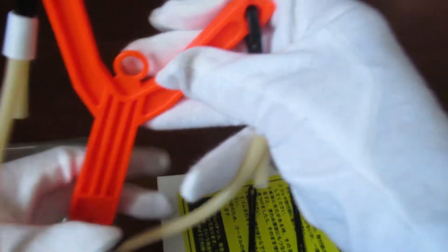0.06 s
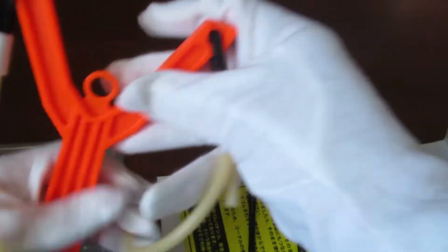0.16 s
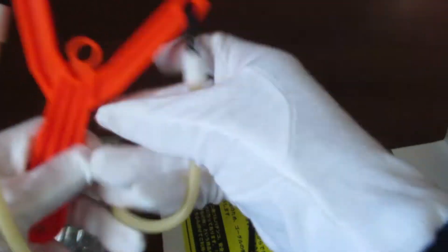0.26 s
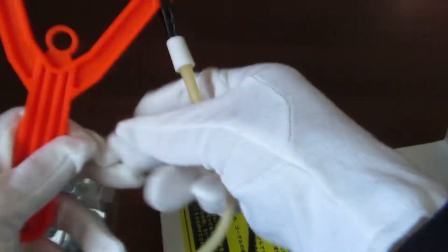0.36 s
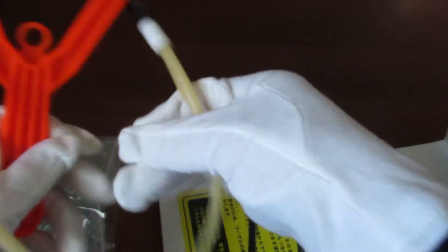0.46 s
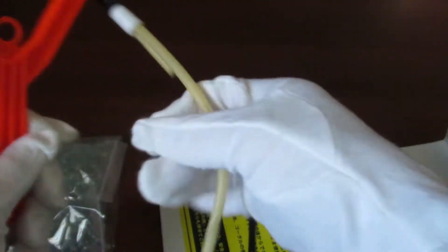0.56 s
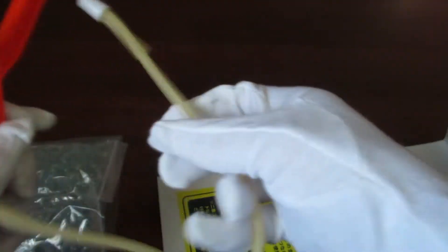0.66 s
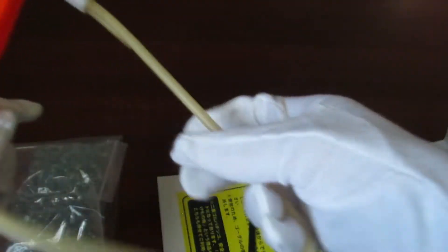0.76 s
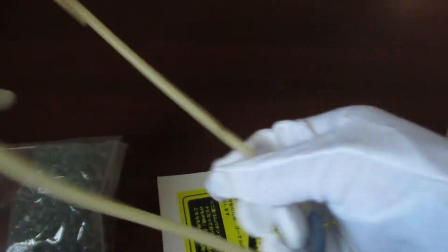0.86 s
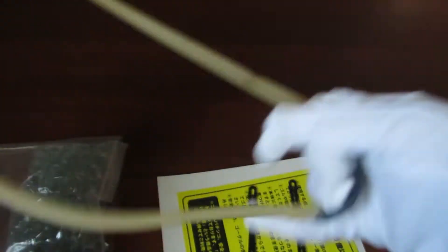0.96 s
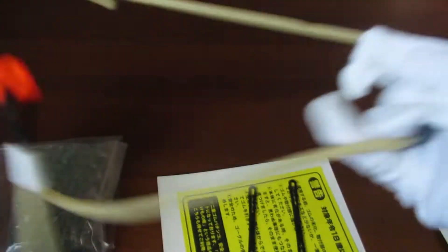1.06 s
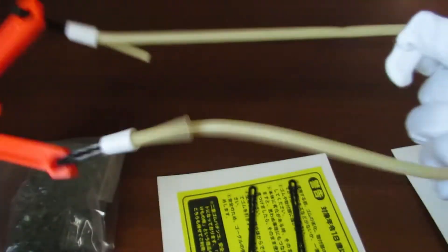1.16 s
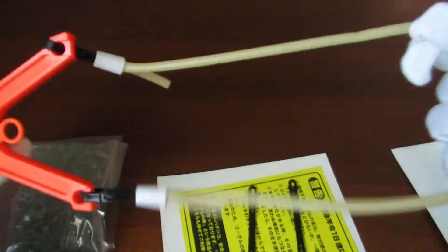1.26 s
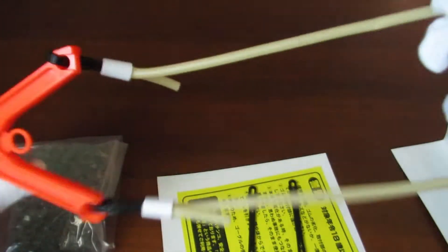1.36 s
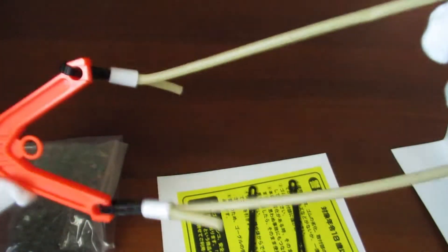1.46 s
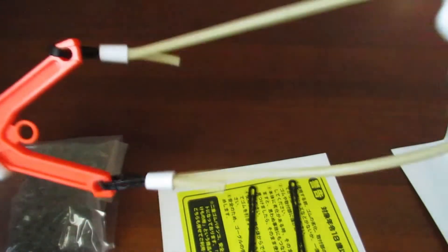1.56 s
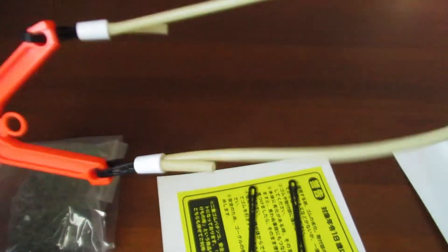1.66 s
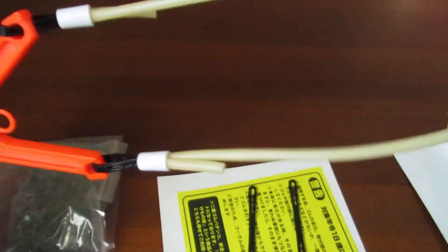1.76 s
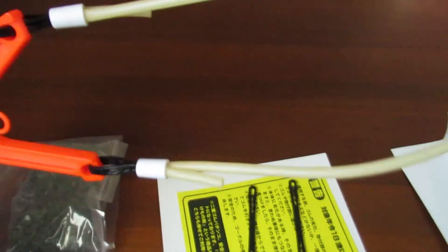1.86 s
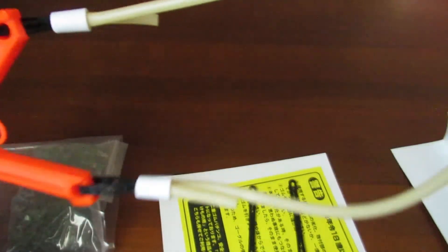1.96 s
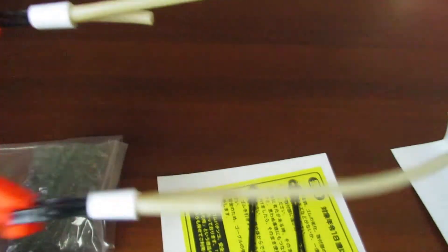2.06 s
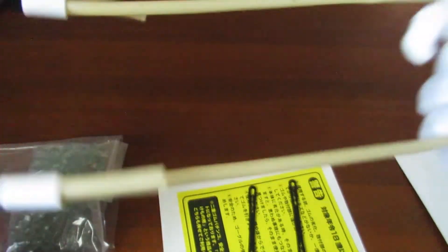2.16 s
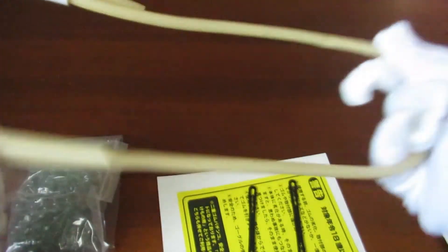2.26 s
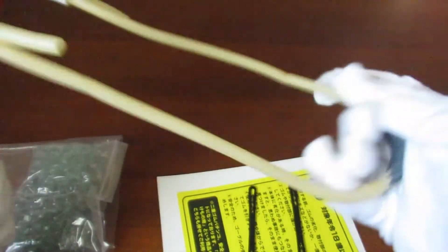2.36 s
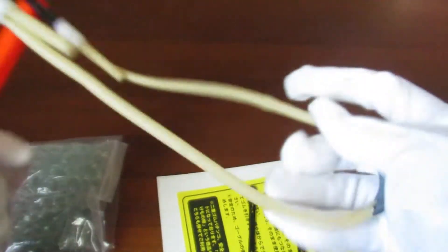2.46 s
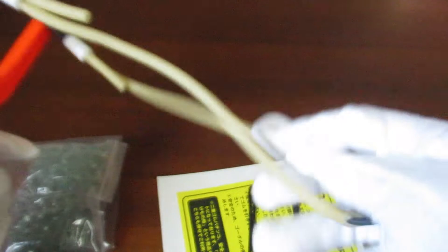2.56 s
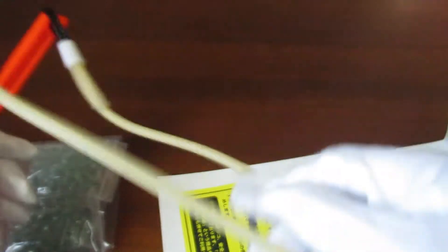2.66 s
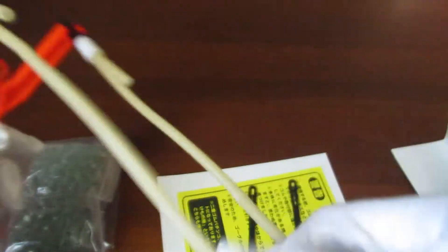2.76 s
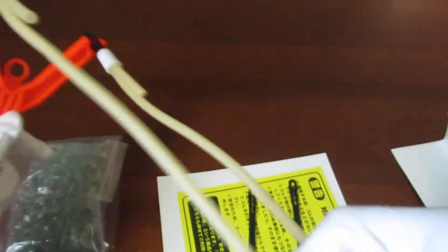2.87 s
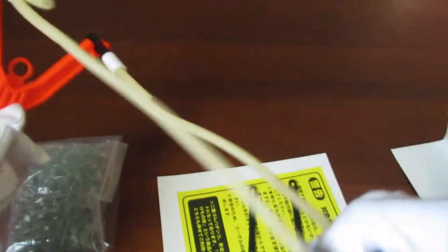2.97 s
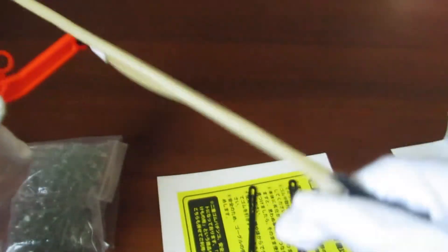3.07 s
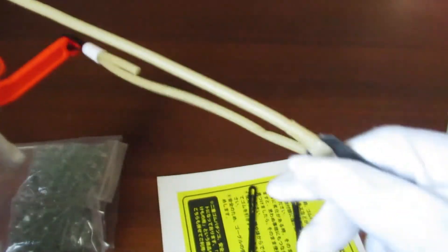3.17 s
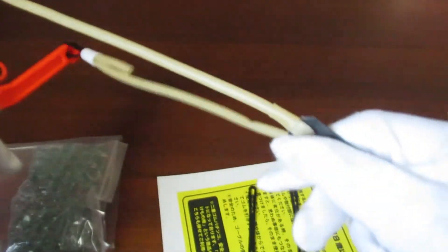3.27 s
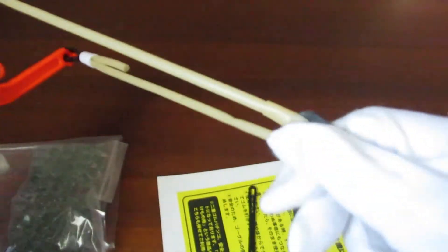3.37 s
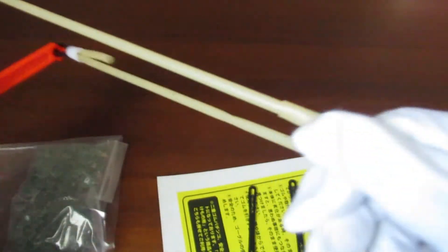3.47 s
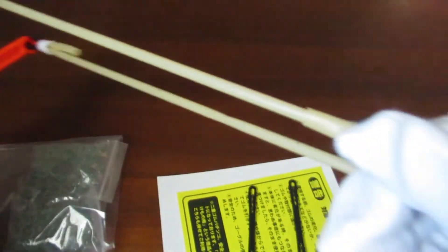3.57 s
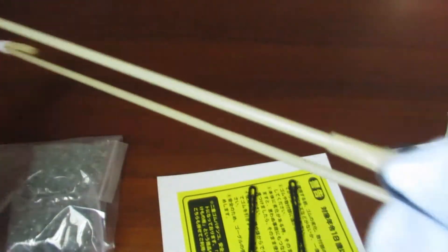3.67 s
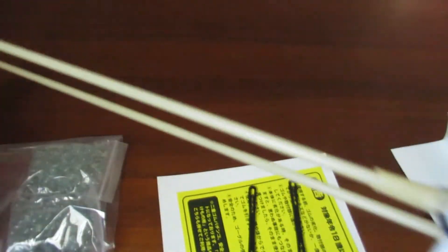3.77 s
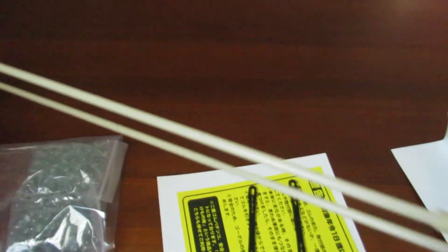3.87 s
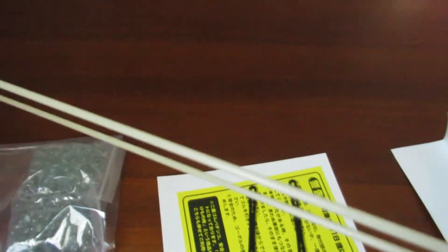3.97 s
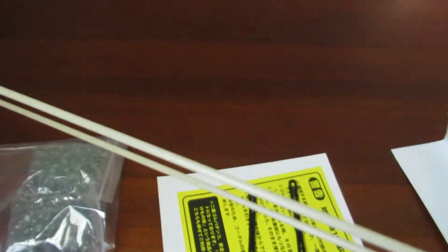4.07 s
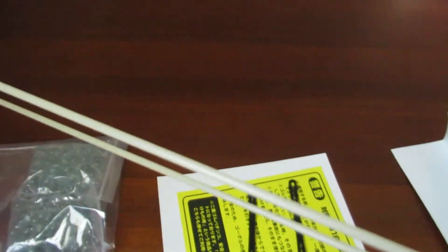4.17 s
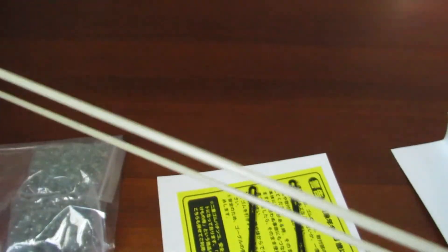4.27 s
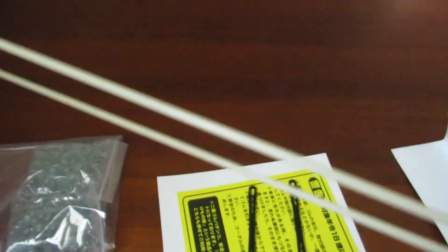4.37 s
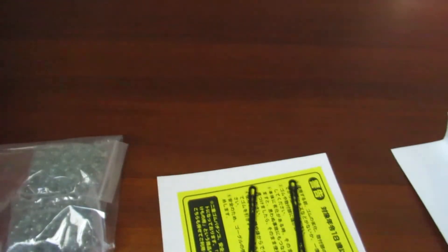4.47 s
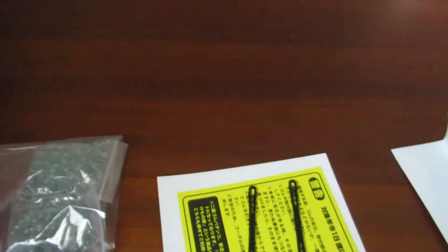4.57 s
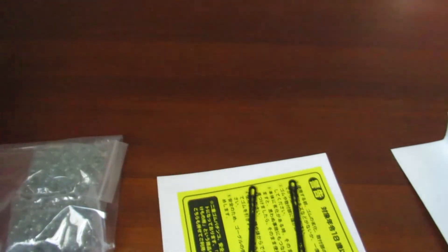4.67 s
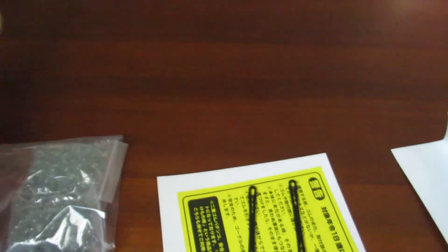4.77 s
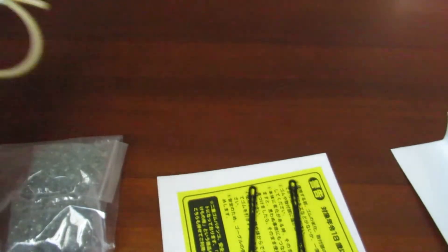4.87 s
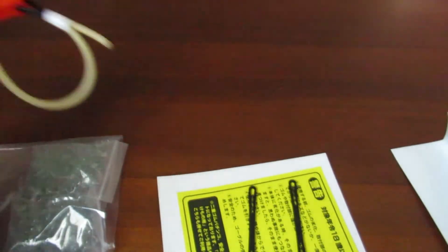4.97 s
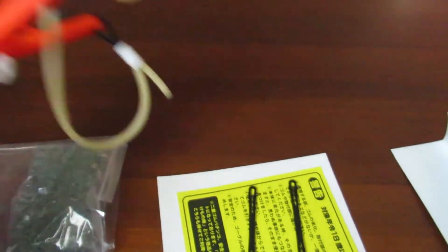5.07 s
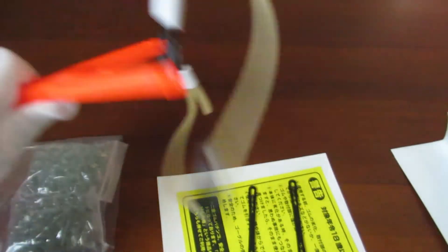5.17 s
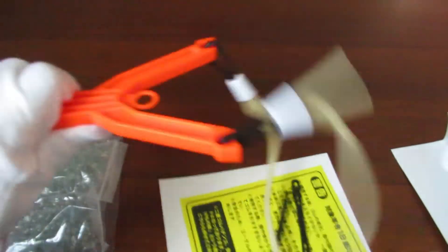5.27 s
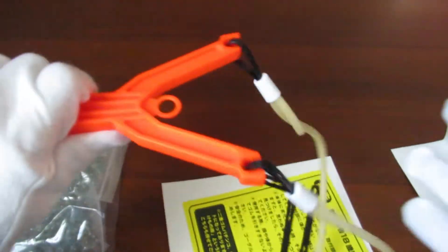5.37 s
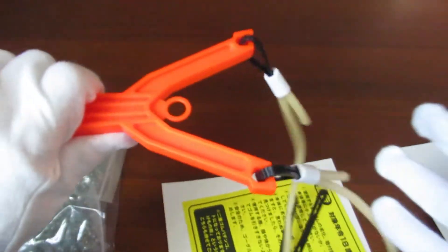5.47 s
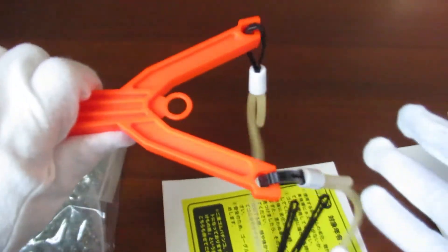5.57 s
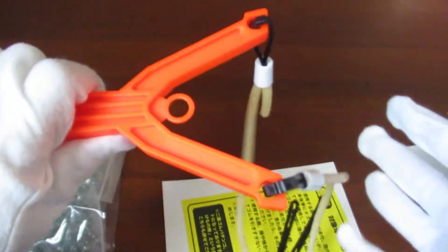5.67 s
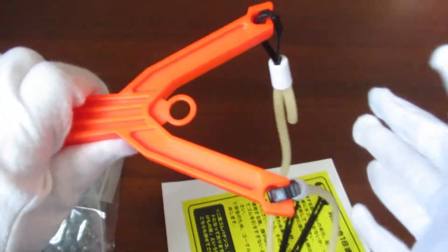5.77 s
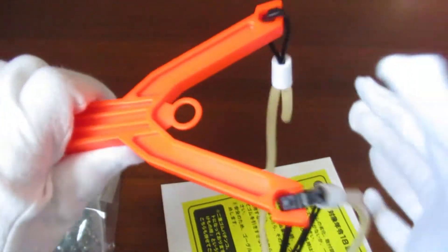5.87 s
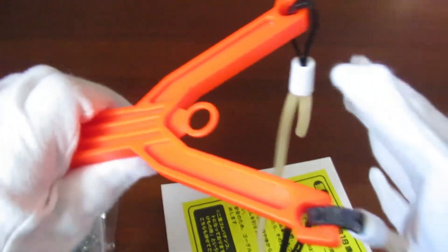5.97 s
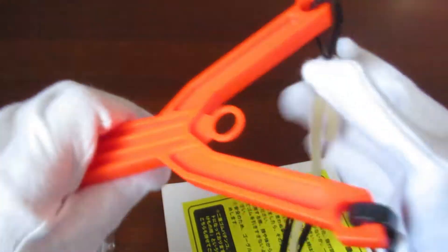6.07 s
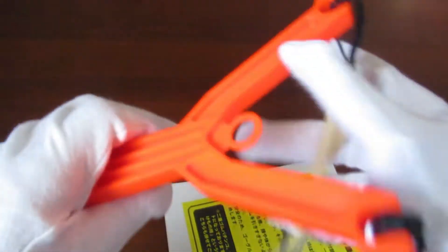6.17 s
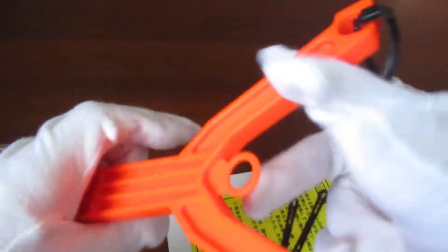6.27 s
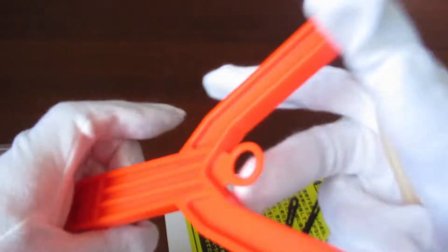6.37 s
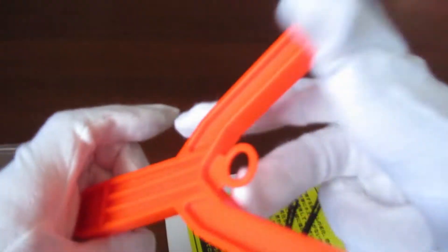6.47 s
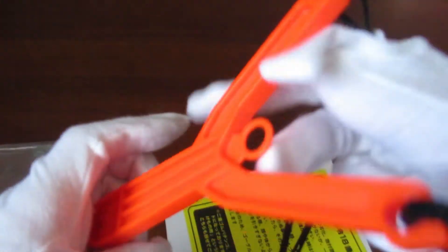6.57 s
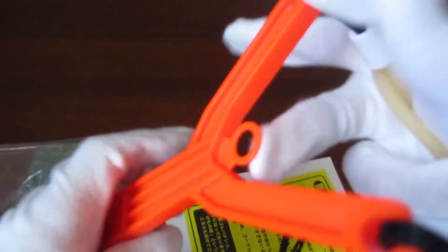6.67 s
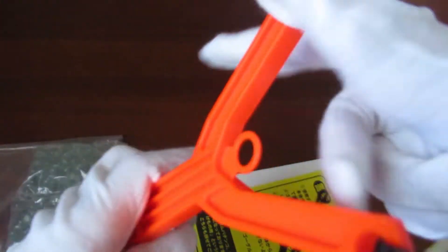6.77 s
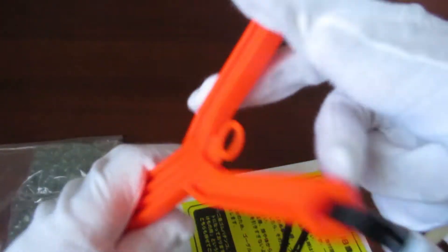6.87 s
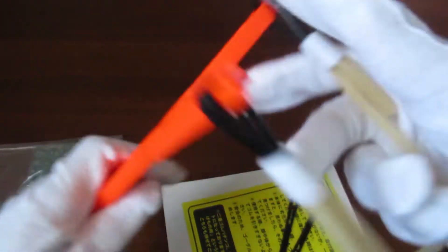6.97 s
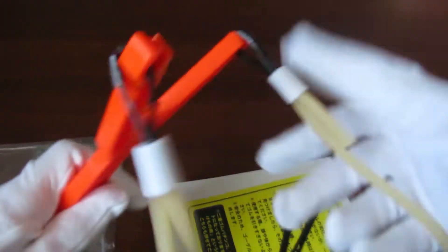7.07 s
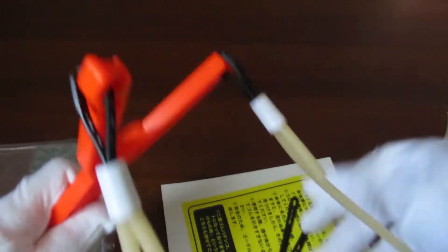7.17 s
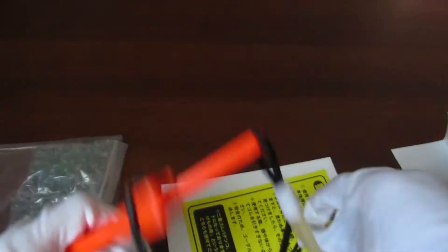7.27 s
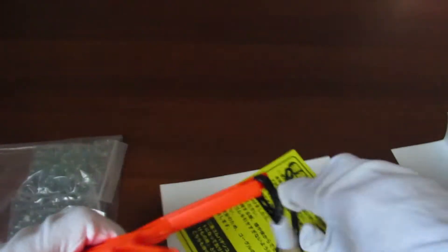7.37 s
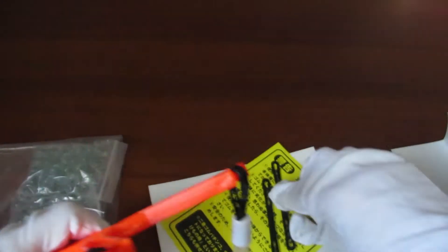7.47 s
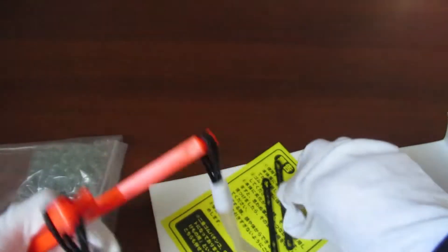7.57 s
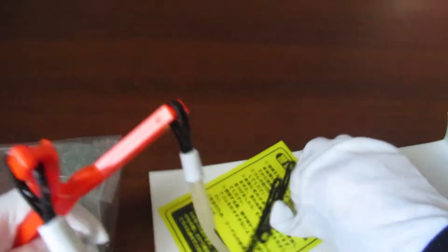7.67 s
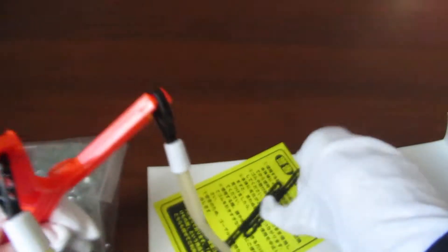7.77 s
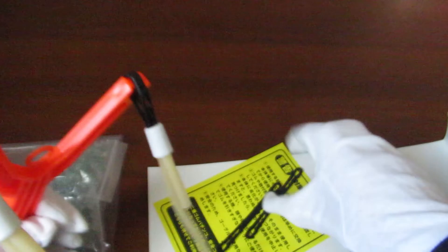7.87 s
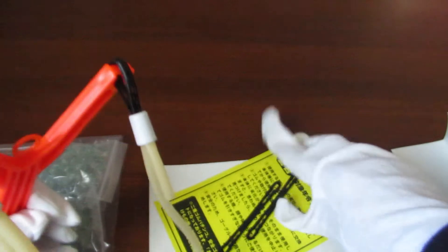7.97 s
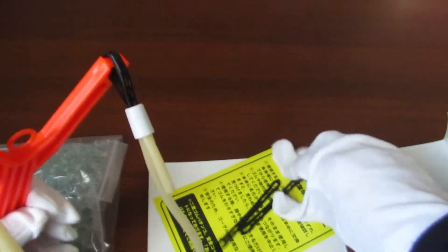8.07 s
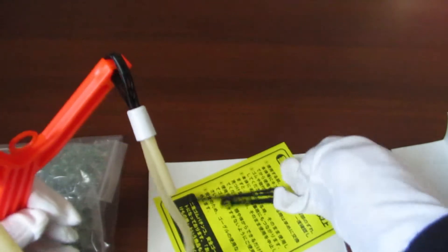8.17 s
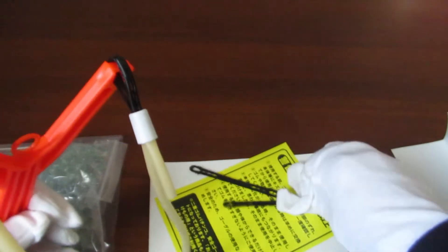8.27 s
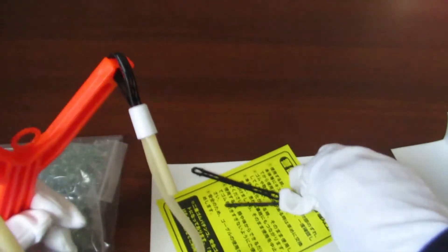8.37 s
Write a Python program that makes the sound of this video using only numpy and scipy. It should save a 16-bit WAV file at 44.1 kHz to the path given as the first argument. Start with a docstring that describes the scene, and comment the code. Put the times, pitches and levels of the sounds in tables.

```python
"""A plastic slingshot is drawn by gloved hands over a desk and let go empty, close to a camera's microphone.
The rubber tubes swish forward (noise and a rising flap), whip the fork and the pouch smacks home
(noise cracks and short damped tones); a small room answers with a fading noise echo.
Clips tick (noise bursts that ring the camera body), gloves rub and loops slide on paper (grainy noise),
plastic squeaks, and a machine drones in the background (steady sines over room air)."""
import sys
import numpy as np
from scipy import signal
from scipy.fft import rfft, irfft
from scipy.io import wavfile
from scipy.ndimage import uniform_filter1d

SR = 44100
rng = np.random.default_rng(int(sys.argv[2]) if len(sys.argv) > 2 else 0)


def int16_out(signal):
    """Quantize to a 16-bit WAV file."""
    q = np.round(np.clip(np.atleast_2d(signal).T, -1, 1) * 32767)
    wavfile.write(sys.argv[1], SR, q.astype(np.int16))


N = 371763
TIME = np.arange(N) / SR


def undb(db):
    """Turn decibels into a gain."""
    return 10 ** (np.asarray(db) / 20)


def unit(x):
    """Scale a sound to rms 1."""
    return x / np.sqrt(np.mean(x ** 2))


def response(points, peaks=()):
    """Filter of unit energy that starts at once (minimum phase), from a spectrum and resonances."""
    hz = np.maximum(np.fft.rfftfreq(4096, 1 / SR), 1)
    point_hz, point_db = np.transpose(points)
    db = np.interp(np.log(hz), np.log(point_hz), point_db)
    for centre, width, height in peaks:
        db = db + height / (1 + (2 * (hz - centre) / width) ** 2)
    cepstrum = irfft(np.log(undb(db)))
    half = len(cepstrum) // 2
    # keeping one side of the cepstrum puts the energy as early as possible
    h = irfft(np.exp(rfft(2 * cepstrum[:half], 2 * half)))
    return h / np.linalg.norm(h)


def colour(x, points, peaks=()):
    """Give a sound the tone colour of a spectrum and resonances."""
    return signal.oaconvolve(x, response(points, peaks))[:len(x)]


def add(track, s, sound):
    """Mix a sound into a track at a time in seconds."""
    i = int(s * SR)
    track[i:i + len(sound)] += sound[:N - i]


def burst(length_s, size=4096):
    """Dense contact noise with a fairly even spectrum that holds briefly and dies."""
    fade = np.exp(-(np.arange(size) / SR / length_s) ** 2)
    spectrum = rfft(rng.standard_normal(size) * fade)
    evened = irfft(spectrum / np.abs(spectrum) ** .6)
    x = evened * fade ** .2
    return x * np.linalg.norm(fade) / np.linalg.norm(x)  # longer bursts carry more energy


def wander(points_per_s):
    """Random curve: straight lines between random values."""
    return np.interp(TIME * points_per_s, np.arange(N), rng.standard_normal(N))


def friction(grain_db, grain_hz):
    """Noise whose level jumps at random, as when fibres catch and slip."""
    return unit(rng.standard_normal(N) * undb(grain_db * wander(grain_hz)))


# Machine hum. Each row: multiple of the shaft rate, level in dB (rms).
SHAFT_HZ = 17.1
DRONE_TONES = [(2, -43), (3, -66), (4, -55), (6, -54), (7, -64), (8, -66.5), (9, -69.5), (10, -53),
               (12, -60), (12.5, -58.5), (14.6, -59), (16, -61), (19.3, -62.5)]
# Tone of the room air. Each row: frequency in Hz, relative level in dB per Hz.
AIR_COLOUR = [(20, -12), (45, -8.5), (90, -10), (160, -1.5), (230, -2), (380, -2.5), (500, -8.5), (900, -8),
              (1150, -11.5), (2000, -15), (2800, -21), (4200, -25.5), (7500, -26), (15000, -32)]
# Resonances in the air noise. Each row: centre in Hz, width in Hz, height in dB.
AIR_RESONANCES = [(699, 134, 6), (1554, 33, 10.9), (7940, 550, 2.7)]
AIR_DB = -48


def background(waver=.035):
    """A machine sounds at multiples of its shaft rate, slightly unsteady, over the rush of room air."""
    angle = 2 * np.pi * SHAFT_HZ * TIME + waver * wander(3)  # waver in radians
    drone = np.zeros(N)
    for multiple, db in DRONE_TONES:
        phase = 2 * np.pi * rng.random()
        drone += np.sqrt(2) * undb(db) * np.sin(multiple * angle + phase)
    air = colour(rng.standard_normal(N), AIR_COLOUR, AIR_RESONANCES)
    return drone + undb(AIR_DB) * air


RISE_SHARE, STROKE_SHAPE = 0.57, 1.28  # share of the length spent swelling; shape 1 is pointed, 2 round


def stroke(s, db, length_s):
    """Power of one sliding movement: it swells to its loudest moment and eases off."""
    before = (s - TIME) / RISE_SHARE
    after = (TIME - s) / (1 - RISE_SHARE)
    away = np.maximum(before, after) / length_s
    near = away < 6
    power = np.zeros(N)
    power[near] = undb(db) ** 2 * np.exp(-away[near] ** STROKE_SHAPE)
    return power


def sliding(rows, light, firm):
    """Play sliding movements, each a blend of a light and a firm friction sound."""
    light_power, firm_power = np.zeros(N), np.zeros(N)
    for s, db, length_s, share in rows:
        power = stroke(s, db, length_s)
        light_power += power * (1 - share)
        firm_power += power * share
    return light * np.sqrt(light_power) + firm * np.sqrt(firm_power)


# Ring of the camera body. Each row: centre in Hz, width in Hz, height in dB.
BODY_RING = [(2070, 390, 3), (3540, 110, 9.5), (5450, 150, 6.5), (8200, 260, 8), (13400, 500, 0)]
# Tone of cloth catching on an edge. Each row: frequency in Hz, relative level in dB per Hz.
CATCH_TONE = [(900, -14), (2000, 6), (3500, 1.5), (5500, 2), (9000, -10), (15000, 1)]
CATCHES_PER_S, CATCH_DB, CATCH_SCATTER_DB = 77, -6, 3


def catches():
    """Cloth catching on an edge ticks the fork: sparse tiny clicks of uneven size."""
    hits = rng.random(N) < CATCHES_PER_S / SR
    clicks = hits * undb(CATCH_SCATTER_DB * rng.standard_normal(N))
    return undb(CATCH_DB) * unit(colour(clicks, CATCH_TONE, BODY_RING))


# Glove strokes over fork and tubes; a light touch only hisses.
# Each row: loudest moment in seconds, level in dB, length in seconds, grip from 0 to 1.
GLOVE_STROKES = [(.05, -62, .12, 0), (0.265, -52.5, 0.082, .2), (0.526, -51.5, 0.063, 0.9),
                 (.67, -54, 0.079, 0.6), (0.893, -54.5, 0.11, 0.9), (1.085, -50, 0.079, 0.74),
                 (1.21, -55, 0.19, .7), (1.61, -57.5, 0.13, 0.3), (1.987, -52, 0.033, .1),
                 (2.112, -60.5, .16, 0.3), (2.454, -48.5, 0.13, 0.34), (2.683, -50, .08, 0.55),
                 (5.34, -46.5, 0.042, 0.85), (6.32, -54.5, 0.12, 0.4), (6.457, -54, 0.033, 0.8),
                 (6.6, -60, .12, 0), (6.745, -60, 0.097, .1), (7.013, -54.5, .18, 0.4),
                 (7.465, -51.5, 0.1, 0.16), (7.746, -51, .08, 0.05), (8.125, -53, 0.07, 0),
                 (8.218, -53, .13, .2)]
# Plastic loops dragged over paper. Each row: loudest moment in seconds, level in dB,
# length in seconds, share of the low squeaky resonance from 0 to 1.
LOOP_DRAGS = [(7.45, -56.5, 0.074, 0.2), (7.627, -55, .14, 0), (7.765, -57, .08, 0.25),
              (8.2, -54.5, .13, 0.83), (8.252, -44.5, 0.028, 1), (8.302, -38.5, 0.022, 1)]
# Tone of a light touch. Each row: frequency in Hz, relative level in dB per Hz.
TOUCH_TONE = [(1000, -10), (3500, -10), (5500, -8.5), (7500, 0.5), (12000, -0.5), (15000, -2.5)]
# Tone of firm rubbing. Each row: frequency in Hz, relative level in dB per Hz.
RUB_TONE = [(300, -5), (1000, 3.5), (2000, 5), (3200, -0.5), (5000, 2.5), (7500, -2), (11000, -4.5),
            (15000, -8)]
# Tone of scraping on paper. Each row: frequency in Hz, relative level in dB per Hz.
SCRAPE_TONE = [(1200, -26), (2500, -2), (3200, 0), (6000, -2), (9000, -11), (15000, -21)]


def handling(ring=0.097):
    """Cloth slides over fork and tubes; loose loops brush the paper, some with a lower squeak."""
    weak_ring = [(hz, width, ring * db) for hz, width, db in BODY_RING]  # rubbing excites it only weakly
    touch = colour(friction(grain_db=3.5, grain_hz=490), TOUCH_TONE, weak_ring)
    grip = colour(friction(grain_db=4.0, grain_hz=600), RUB_TONE, weak_ring) + catches()
    brush = colour(friction(grain_db=6.0, grain_hz=394), SCRAPE_TONE, [(5370, 2100, 16.0)])
    squeak_peaks = [(3260, 460, 12.0), (4330, 1300, 14.0)]
    squeak = colour(friction(grain_db=6.5, grain_hz=398.5), SCRAPE_TONE, squeak_peaks)
    return sliding(GLOVE_STROKES, touch, grip) + sliding(LOOP_DRAGS, brush, squeak)


# Plastic parts knocking. Each row: start in seconds, level in dB (before a shared 3 dB cut),
# knock pitch in Hz, treble slope in dB per octave, contact length in seconds.
PLASTIC_TICKS = [(0.981, -42, 3300, 0, .0033), (1.043, -41, 3300, -2.5, 0.0064),
                 (1.338, -42.5, 3550, -4, 0.0028), (2.236, -44, 3200, 0, .005),
                 (2.5083, -30, 3100, -6, 0.0025), (2.687, -40, 2200, -8, 0.0037),
                 (2.803, -42, 2860, -5, .0015), (3.353, -28, 1510, -8.5, 0.0025),
                 (3.43, -26, 830, -3, 0.0017), (3.568, -30, 1850, -3, 0.0006),
                 (3.5925, -25.5, 2060, -9.5, 0.0011), (4.727, -39.5, 2700, -5, .003),
                 (5.294, -39, 2200, 0, .009), (5.3015, -22.5, 3070, -8.5, 0.0016),
                 (5.355, -41, 2200, -6.5, .012), (5.426, -40.5, 3400, -2.5, .003),
                 (5.521, -41.5, 3400, -9, 0.0021), (7.0392, -35, 2800, -3, 0.002),
                 (7.072, -30, 1900, -8.5, 0.0028), (7.075, -35.5, 3300, -14, 0.0036),
                 (7.166, -40, 3000, -9.5, 0.0038), (7.364, -39, 7500, -3, .001),
                 (7.373, -41.5, 3400, -13, .005), (7.385, -27, 12500, 0, .0015),
                 (7.416, -39.5, 3650, -14, 0.0093), (7.591, -45, 3380, -4, .004),
                 (7.631, -39, 5030, -12, 0.0013), (7.963, -43.5, 3260, -7, .003),
                 (8.061, -42, 5500, 2, .0028), (8.091, -38, 11000, 0, .002),
                 (8.285, -31, 3250, -16, 0.0033)]
# Overall tone of the ticks. Each row: frequency in Hz, relative level in dB per Hz.
TICK_TONE = [(200, 11), (1000, -1), (2200, 1), (6000, 4), (15000, -3)]


def ticks(knock_db=6.0, knock_width=0.44, below_db_per_octave=22):
    """Each small part knocks at its own pitch, with its own treble, and rings the camera body."""
    out = np.zeros(N)
    for s, db, hz, slope_db, length_s in PLASTIC_TICKS:
        # from two octaves below the knock to four octaves above it
        contact = [(hz / 4, -2 * below_db_per_octave), (hz, 0), (hz * 16, 4 * slope_db)]
        knock = [(hz, knock_width * hz, knock_db)]
        add(out, s, undb(db) * colour(burst(length_s), contact, knock))
    return undb(-3) * colour(out, TICK_TONE, BODY_RING)


# Fingers slipping on the plastic with a thin squeak. Each row: loudest moment in seconds,
# level in dB, length in seconds, pitch in Hz, upper resonance in dB.
FINGER_CHIRPS = [(1.438, -48, 0.019, 8020, 30), (2.075, -59, .03, 7250, 5), (4.651, -47, .02, 8000, 3),
                 (7.4, -45, 0.014, 8700, 6)]
CHIRP_WIDTH_HZ, CHIRP_RING_DB, CHIRP_UPPER_RATIO = 1500, 25, 1.67


def chirps():
    """A finger slips and the plastic squeaks briefly at two high resonances."""
    slip = friction(grain_db=7.5, grain_hz=493)
    out = np.zeros(N)
    for s, db, length_s, hz, upper_db in FINGER_CHIRPS:
        lower = (hz, CHIRP_WIDTH_HZ, CHIRP_RING_DB)
        upper = (hz * CHIRP_UPPER_RATIO, CHIRP_WIDTH_HZ * CHIRP_UPPER_RATIO, upper_db)
        out += colour(slip, RUB_TONE, [lower, upper]) * np.sqrt(stroke(s, db, length_s))
    return out


# Tone of the rushing tubes. Each row: frequency in Hz, relative level in dB per Hz.
RUSH_TONE = [(500, -12), (2500, -11), (4500, -4), (7000, -1), (10000, -3), (15000, -4)]
# the tubes go slack at SLACK_S: their rush builds up to that moment, holds and dies
SLACK_S, RUSH_DB, RUSH_HOLD_S = 4.497, -24.5, 0.0037
RUSH_RISE_DB_PER_S, RUSH_FALL_DB_PER_S = 1020, 361
# slack tubes flap the air, faster and weaker as the wave runs up to the fork
FLAP_HZ, FLAP_OCTAVES_PER_S = 130.6, 75
FLAP_DB, FLAP_FALL_DB_PER_S = -25, 167
FLAP_RAMP_S, FLAP_LENGTH_S = 0.0031, .04  # the ramp fades the flap both in and out
FLAP_ROUGH = 0.46  # the two tubes flap out of step, so the note is ragged


def swish():
    """The tubes hiss as they gather speed, then go slack and flap."""
    t = TIME - SLACK_S
    rise_db = RUSH_RISE_DB_PER_S * np.maximum(-t, 0)
    fall_db = RUSH_FALL_DB_PER_S * np.maximum(t - RUSH_HOLD_S, 0)
    rush_gain = undb(np.maximum(RUSH_DB - rise_db - fall_db, -200))
    rush = colour(friction(grain_db=2, grain_hz=700), RUSH_TONE) * rush_gain
    age = np.clip(t, 0, FLAP_LENGTH_S)
    gate = np.clip(np.minimum(age, FLAP_LENGTH_S - age) / FLAP_RAMP_S, 0, 1)
    hz = FLAP_HZ * 2 ** (FLAP_OCTAVES_PER_S * age)
    note = np.sin(2 * np.pi * np.cumsum(hz * (t > 0)) / SR)
    flap = note * gate * undb(FLAP_DB - FLAP_FALL_DB_PER_S * age)
    ragged = 1 + FLAP_ROUGH * wander(330)
    return rush + flap * ragged


# Tubes and pouch striking. Each row: start in seconds, crack level in dB, crack decay in seconds,
# body level in dB, body pitch in Hz.
RUBBER_SLAPS = [(4.4996, -24, 0.0016, -23, 750), (4.511, -16.5, 0.002, -33, 1200),
                (4.5153, -12, .0014, -17, 1720), (4.522, -17.5, .002, -19, 1600),
                (4.5245, -16.5, 0.002, -15, 1750), (4.5285, -20, .0035, -13.5, 2030),
                (4.533, -12.5, 0.0047, -0.5, 1836), (4.5450, -14.5, 0.0031, -15, 2220),
                (4.5490, -15.5, .003, -23, 1930), (4.5520, -16.5, 0.0019, -19, 1240),
                (4.5698, -19.5, 0.00076, -30, 2000), (4.572, -18.5, 0.00096, -22.5, 1160),
                (4.5870, -21, 0.0017, -28, 1900)]
# Tone of the cracks. Each row: frequency in Hz, relative level in dB per Hz.
CRACK_TONE = [(100, -20), (300, -7), (700, 2), (1100, 1.5), (2000, 1), (3100, -0.5), (5200, 4.5),
              (7000, -3), (10000, -8.5), (15000, -14)]
BODY_SWELL_CYCLES = 1.52  # the rubber's note peaks after this many cycles, then soon dies
# after the pouch lands, the loose tubes keep pattering against the fork
PATTER_S, PATTER_LENGTH_S, PATTER_DB, PATTER_FALL_DB_PER_S = 4.556, .09, -17, 210


def snap(count=14):
    """Each slap is a sharp crack and a few cycles of heavily damped rubber; a fading patter follows."""
    cracks, bodies = np.zeros(N), np.zeros(N)
    t = TIME[:SR // 20]
    for s, crack_db, decay_s, body_db, hz in RUBBER_SLAPS:
        add(cracks, s, undb(crack_db) * burst(decay_s))
        age = t * hz / BODY_SWELL_CYCLES
        swell = age * np.exp((1 - age ** 2) / 2)
        add(bodies, s, undb(body_db) * swell * np.sin(2 * np.pi * hz * t))
    # one small slap at a random moment in each equal slot
    for after_s in (np.arange(count) + rng.random(count)) / count * PATTER_LENGTH_S:
        gain = undb(PATTER_DB - PATTER_FALL_DB_PER_S * after_s) * rng.random()
        add(cracks, PATTER_S + after_s, gain * burst(0.001))
    return colour(cracks, CRACK_TONE) + bodies


# Tone of the room's answer. Each row: frequency in Hz, relative level in dB per Hz.
ROOM_TONE = [(80, -1), (300, 0), (1100, 0), (2000, -1), (3200, 0.5), (5200, 0), (8000, 1), (15000, -1.5)]
ROOM_T60_S, ROOM_TREBLE_T60_S = 0.28, 0.22  # time to fade by 60 dB


def room(x, wet_db, first_s, early_db, early_s=0.013, split_hz=6000):
    """Desk and near walls answer first, then the small furnished room; the treble dies first."""
    t = TIME[:SR // 2]
    noise = colour(rng.standard_normal(len(t)), ROOM_TONE)
    low = signal.sosfiltfilt(signal.butter(2, split_hz, fs=SR, output="sos"), noise)
    treble = noise - low
    tail = low * undb(-60 * t / ROOM_T60_S) + treble * undb(-60 * t / ROOM_TREBLE_T60_S)
    opening = np.clip(2 * t / first_s - 1, 0, 1)  # silent at first, fully open at first_s
    early_boost = undb(early_db * np.exp(-(t / early_s) ** 2))
    tail = tail * opening * early_boost
    return x + undb(wet_db) * signal.oaconvolve(x, tail / np.linalg.norm(tail))[:N]


def scene():
    """The slingshot in its room; small handling sounds stay close to the desk."""
    loud = room(snap() + swish(), wet_db=-6.0, first_s=0.0025, early_db=1.5)
    small = room(ticks() + handling() + chirps(), wet_db=-7.5, first_s=0.0039, early_db=4.5)
    return (loud + small + background())[None]


TOP_HZ = 15080


def record(dry, threshold_db=-18, squeeze=0.45, recover_db_per_s=4.0, attack_s=0.022):
    """Gain control ducks after a loud sound and creeps back; peaks are rounded and the top cut steeply."""
    power = uniform_filter1d(dry[0] ** 2, SR // 200)  # averaged over 5 ms
    over_db = np.maximum(10 * np.log10(np.abs(power) + 1e-12) - threshold_db, 0)
    ramp = recover_db_per_s * TIME
    held_db = np.maximum.accumulate(squeeze * over_db + ramp) - ramp  # jumps up, falls slowly
    pole = np.exp(-1 / (attack_s * SR))
    duck_db = signal.lfilter([1 - pole], [1, -pole], held_db)
    out = dry * undb(-duck_db)
    out = out / (1 + (out / .8) ** 4) ** .25  # peaks stay below 0.8
    low_pass = signal.firwin(801, TOP_HZ, fs=SR, window="blackman")
    return signal.fftconvolve(out, low_pass[None], mode="same")


dry = scene()
out = record(dry)
int16_out(out)
```